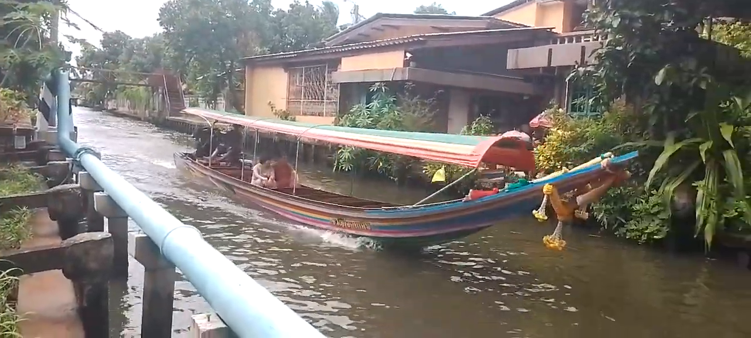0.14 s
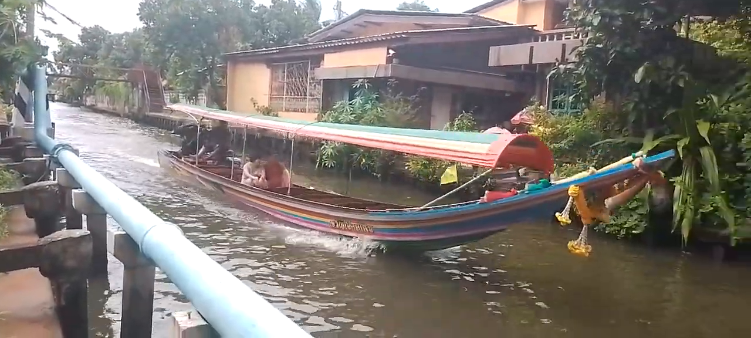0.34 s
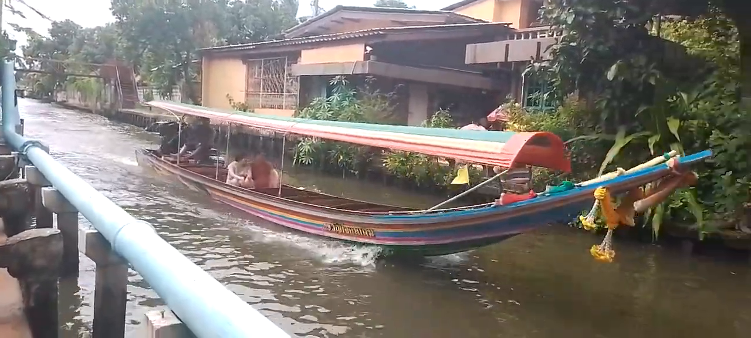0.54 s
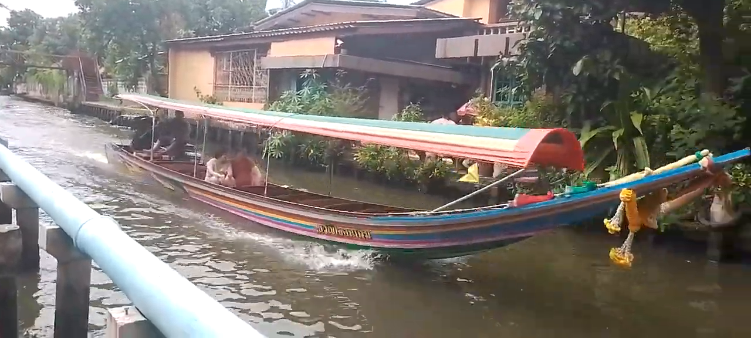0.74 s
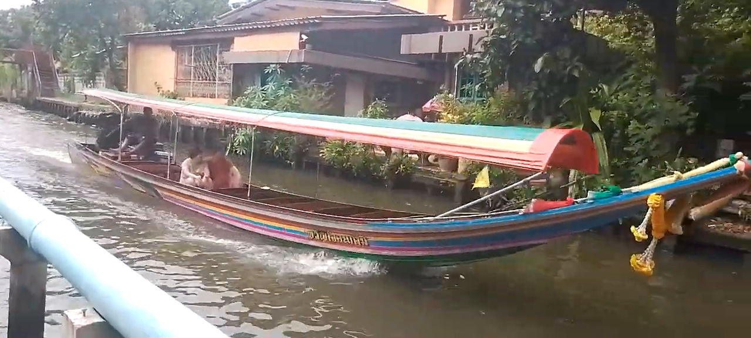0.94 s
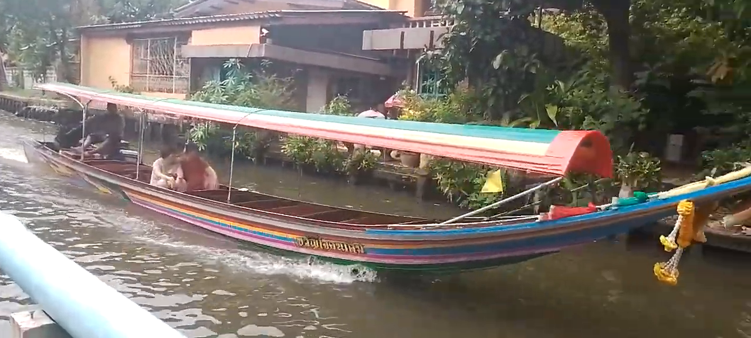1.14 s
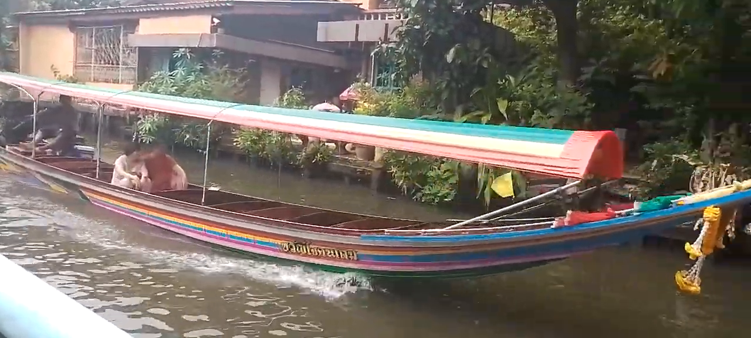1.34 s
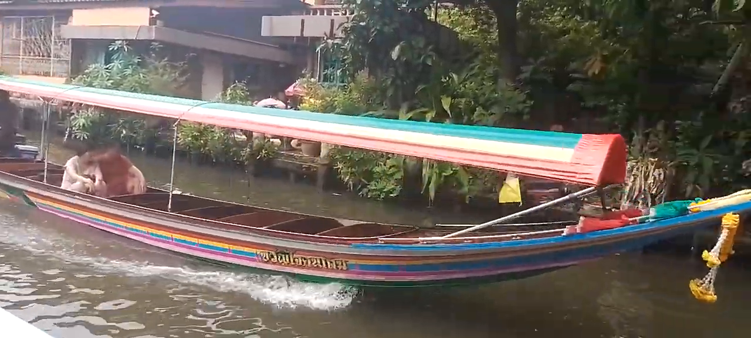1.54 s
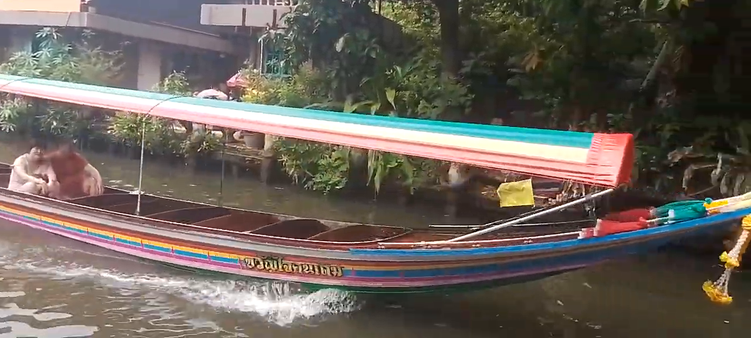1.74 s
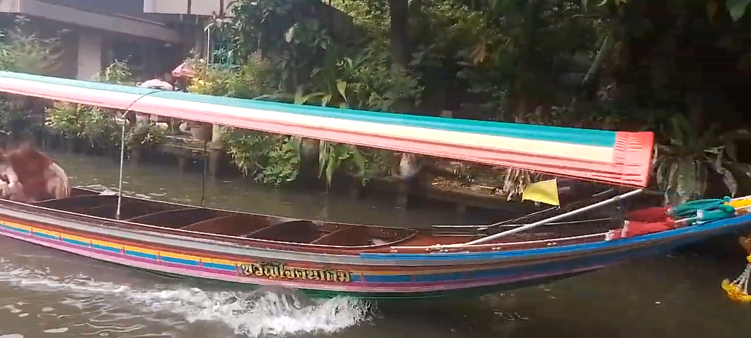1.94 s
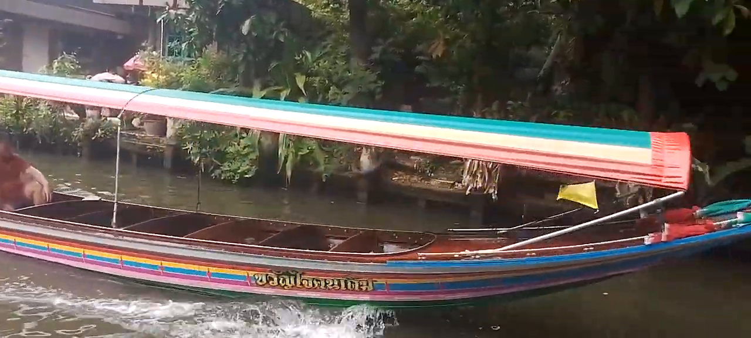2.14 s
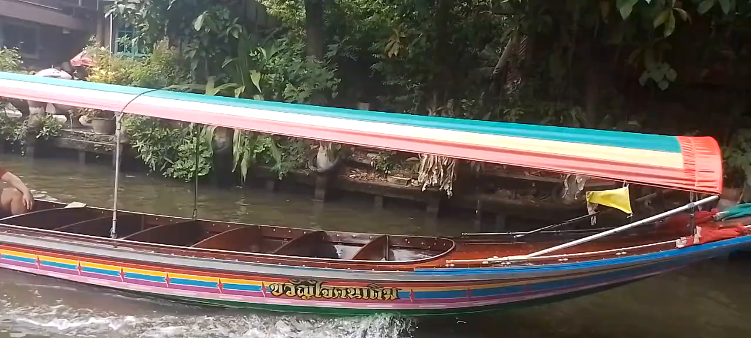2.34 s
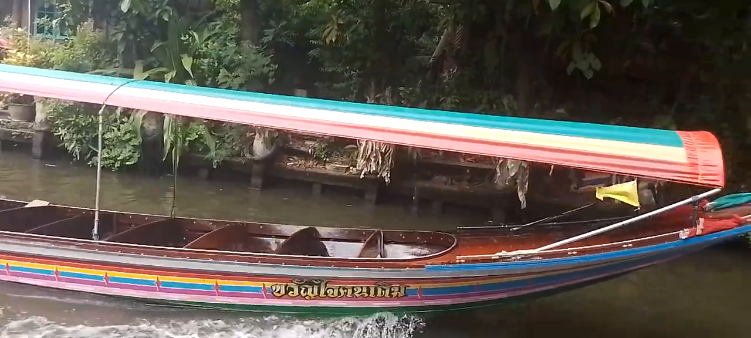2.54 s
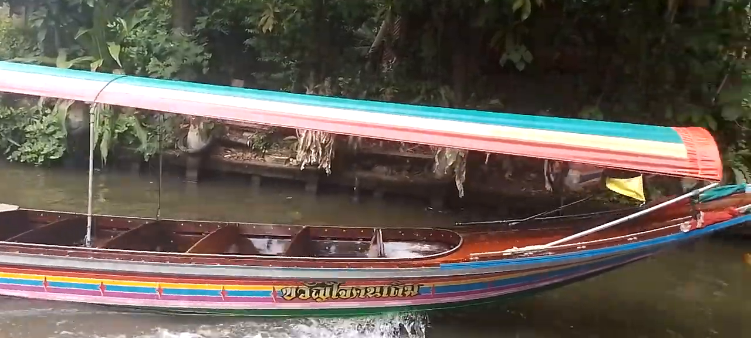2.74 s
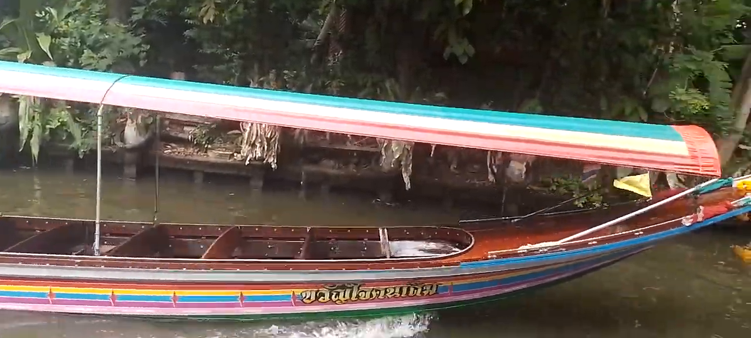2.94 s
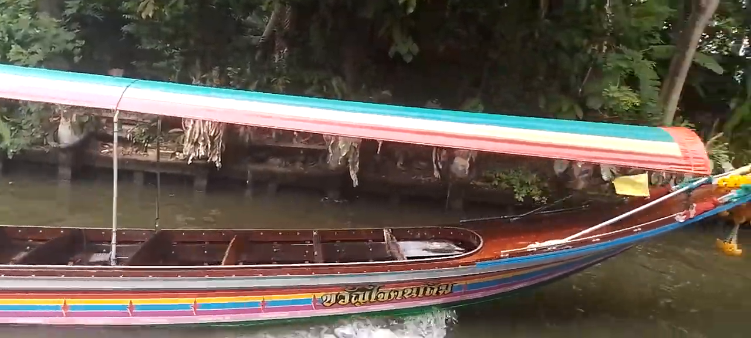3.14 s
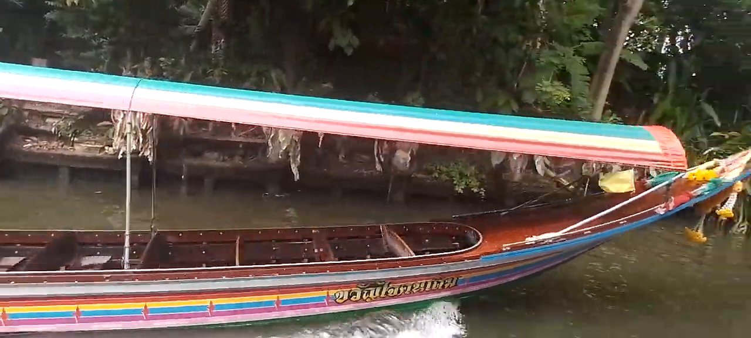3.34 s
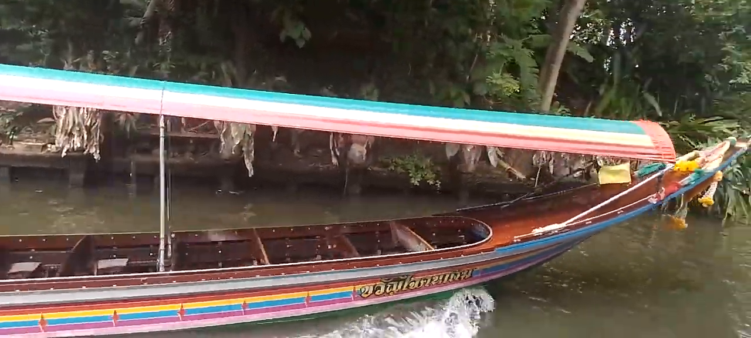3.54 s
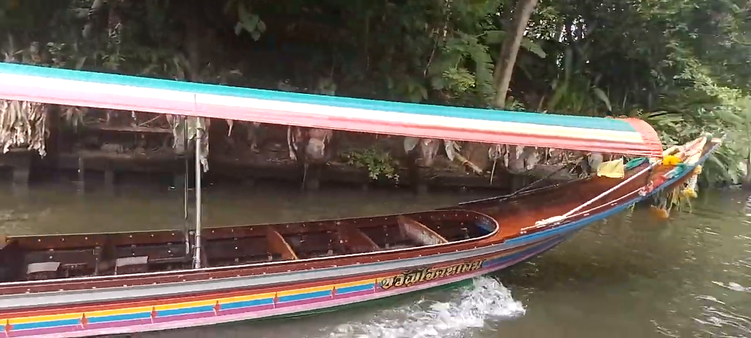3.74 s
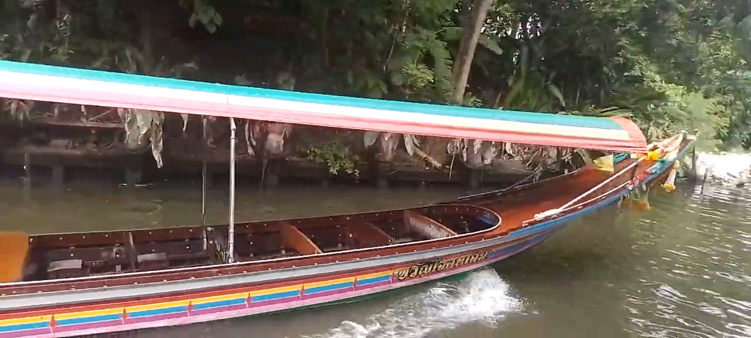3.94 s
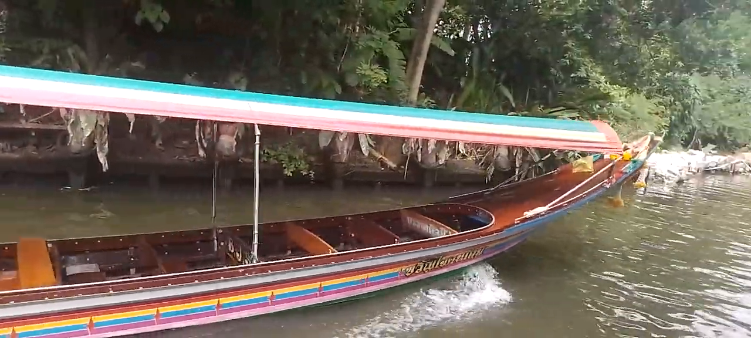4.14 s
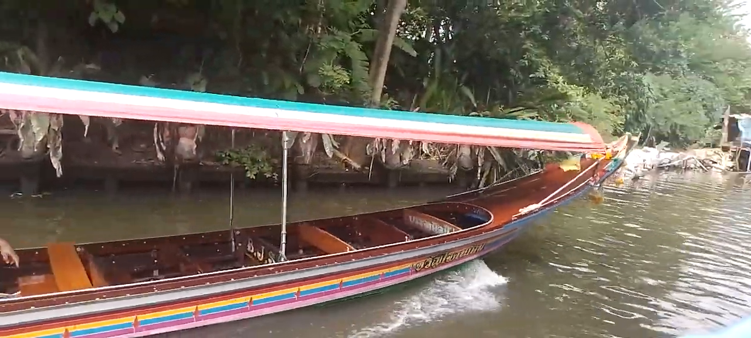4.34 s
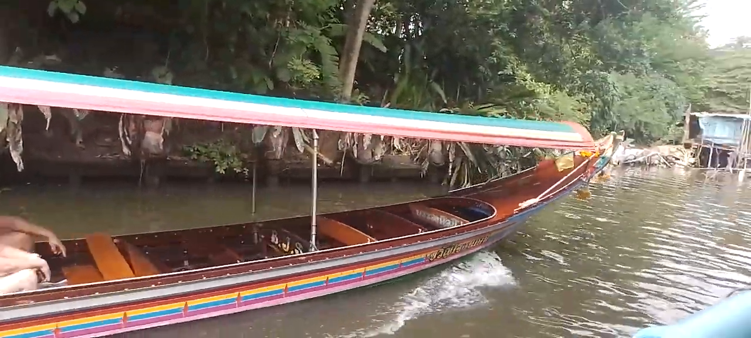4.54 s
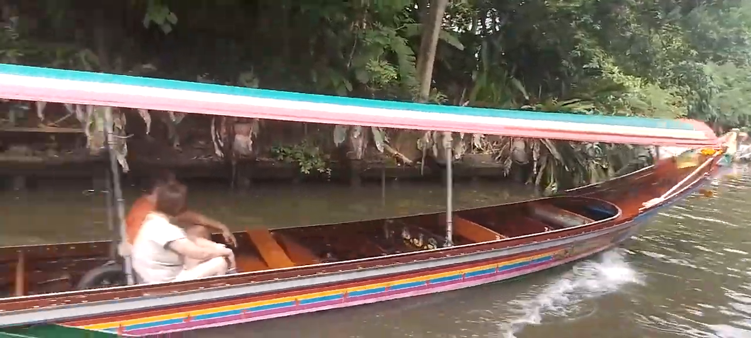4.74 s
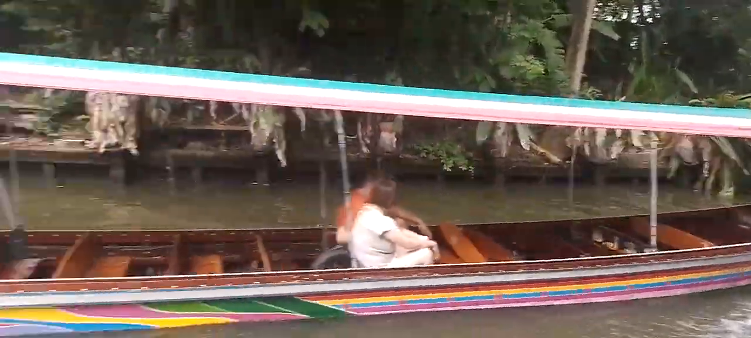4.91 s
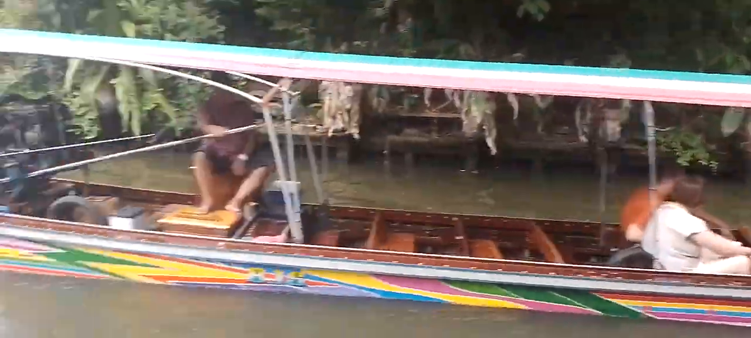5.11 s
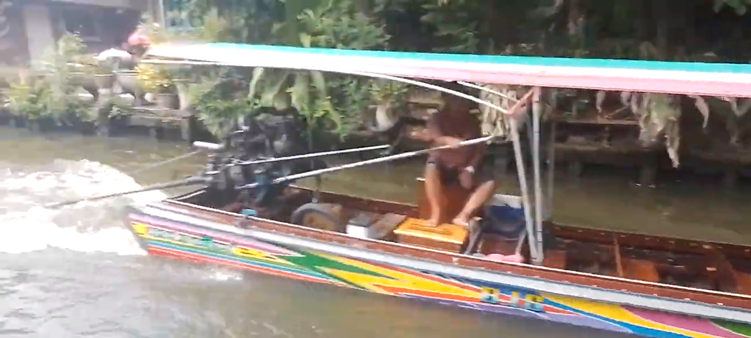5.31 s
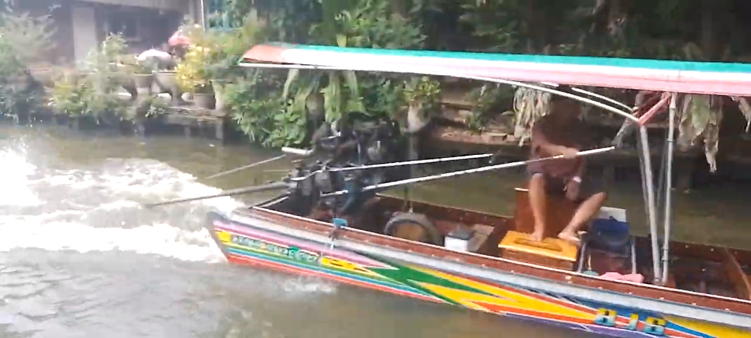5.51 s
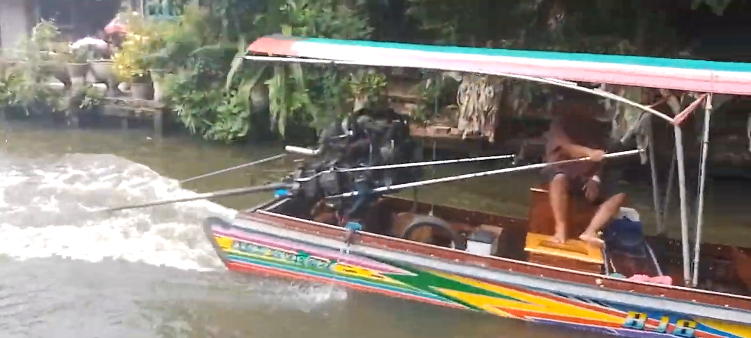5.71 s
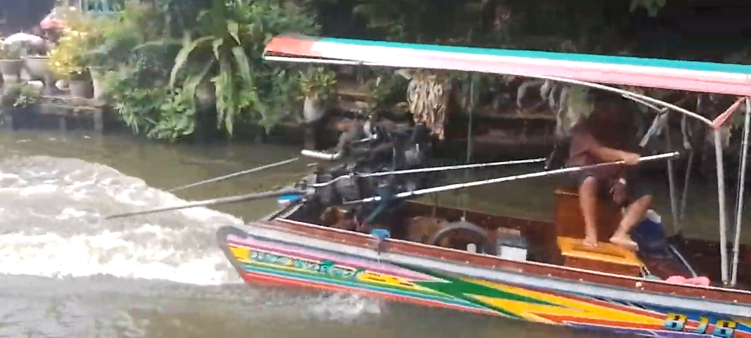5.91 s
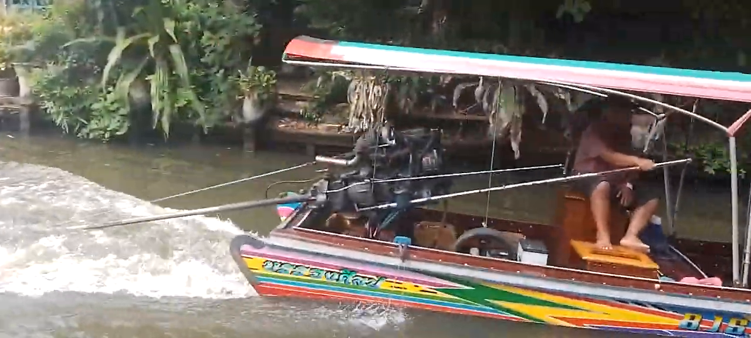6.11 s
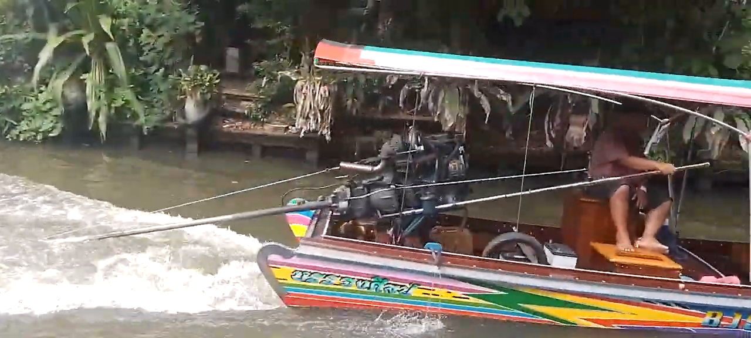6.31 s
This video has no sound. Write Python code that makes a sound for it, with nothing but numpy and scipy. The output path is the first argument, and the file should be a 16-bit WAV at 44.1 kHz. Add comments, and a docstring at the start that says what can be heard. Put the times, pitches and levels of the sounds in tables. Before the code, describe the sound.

A long narrow boat comes along a canal, its open stern engine throbbing faintly over a hiss of water. The hum grows and a loose metal part clinks several times. Then the engine revs higher and the stern passes close to the microphone, with splashing spray and a run of rough exhaust barks. The engine is loudest at the end, over the rush of the wake.

```python
"""The open stern engine of a long narrow boat throbs and hums as it passes close by on a canal.
One firing per crank turn rings the exhaust pipe, which barks as the stern goes by; a loose part clinks.
Engine roar and the rush of spray reach two microphone ports that each whistle at their own pitch.
A noise suppressor holds down whatever is faint."""
import sys
import numpy as np
from scipy import signal
from scipy.io import wavfile
from scipy.ndimage import uniform_filter1d

SR = 44100
rng = np.random.default_rng(int(sys.argv[2]) if len(sys.argv) > 2 else 0)


def master_out(mix):
    """Clip the mix to full scale and print it as 16-bit PCM to the path in sys.argv[1]."""
    frames = np.transpose(np.atleast_2d(mix))
    ceiling = np.clip(frames, -1, 1)
    pcm = np.round(ceiling * 32767).astype(np.int16)
    wavfile.write(sys.argv[1], SR, pcm)


N = 285327
FRAME, HOP = 1024, 256

# Each row: time in seconds, engine in view 0-1, left port lag in ms, factor on port coherence.
BEARING = [(0, 0.5, 0.21, 3.1), (1.5, 0.1, .23, 0.85), (3, 0.04, 0.34, 0.98), (3.6, 0.1, 0.37, 0.32),
           (4.6, 0, 0.35, 1), (4.85, 0.12, 0.44, 1.1), (5.1, 0.55, 0.32, 0.96), (5.18, 0.6, 0.22, 1.25),
           (5.6, 0.67, 0.06, 0.9), (6.47, 0.82, 0.073, 0.73)]
# Each row: time in seconds, nearness of the boat 0-1.
NEARNESS = [(0, 0.13), (3.2, 0.4), (3.8, 0.36), (4.2, 0.9), (6.47, 0.7)]
# Each row: frequency in Hz, base coherence of the two ports 0-1.
COHERENCE = [(300, 0.95), (700, 0.91), (1000, 1), (1500, 0.22), (3000, 0.12), (5000, 0.1), (8000, 0.25),
             (15000, 0.042)]
# Each row: time in seconds, then base levels of roar, left spray and right spray in dB.
RUSH_DB = [(0, -75, -68, -73), (.3, -74.5, -67.5, -74), (.85, -74, -66, -71), (1.2, -74, -63.5, -71.5),
           (1.9, -73, -61, -71.6), (2.8, -72, -60, -71), (3.5, -72, -65, -69), (3.85, -71, -66, -68.5),
           (4.15, -68.5, -63, -63.5), (4.45, -65.5, -60.5, -62), (4.86, -64.5, -61.5, -60.5),
           (4.91, -63.5, -53.5, -57.5), (5.2, -63, -51, -56), (5.4, -63, -52.5, -58), (5.7, -63, -58, -63),
           (6.2, -63.5, -57, -62.5), (6.47, -64, -53.5, -58.5)]
# Each row: frequency in Hz, rumble gain in dB.
RUMBLE_DB = [(10, -14), (45, -22), (70, -24), (110, -10), (140, 2), (165, -13), (200, 3), (300, -15),
             (450, -60)]

# Spray through the ports, nearing and abreast. Each row: frequency in Hz, left and right gain in dB.
SPRAY_AHEAD_DB = [(4000, -15, -15), (5000, -15, -15), (5900, -11.5, -14), (6550, -5.5, -10),
                  (7050, 0, -9.5), (7500, -5, -9), (8100, -11, -4), (9000, -12.5, -2), (10200, -16.5, -1),
                  (11000, -19, -2), (12000, -20, -7), (13200, -21, -13), (14200, -21, -16),
                  (15500, -21, -18)]
SPRAY_ABREAST_DB = [(4000, -12.9, -7.6), (5000, -10.9, -8.7), (5800, -7.6, -8.0), (6400, -4.5, -6.7),
                    (7050, 0.0, -6.1), (7600, -1.2, -4.0), (8200, -7.7, -4.2), (9000, -13.0, -2.8),
                    (10200, -15.7, 0.0), (11000, -15.3, -2.2), (12000, -18.0, -4), (13200, -18, -6.5),
                    (14200, -18, -9.5), (15500, -19, -12)]
# Sheets of spray off the stern. Each row: centre in seconds, left and right level in dB.
SPLASHES = [(4.93, -51, -51.5), (5.038, -44, -63), (5.09, -50, -57), (5.148, -59, -58), (5.222, -53.5, -62),
            (5.288, -49.5, -54), (5.325, -69, -61), (5.413, -45.5, -56), (5.462, -49.5, -56),
            (5.547, -56, -78)]
# Spray reflected by the hull. Each row: time in seconds, comb ripple in dB.
HULL_ECHO_DB = [(4.85, 0), (4.92, 3), (5.45, 3), (5.6, 0)]
# The clearest drops. Each row: time in seconds, added treble gain.
DROPS = [(3.083, 1), (3.09, 1.2), (3.1565, 2.8), (3.191, 1.1), (5.292, 1), (5.547, .8)]

# Roar from afar, behind the hull and in view. Each row: frequency in Hz, left and right gain in dB.
ROAR_FAR_DB = [(427, -6, -10.5), (716, -4.5, -4.5), (815, -1.5, -0.5), (1215, 0, -1.5), (1370, -2, -6),
               (1870, -1, -1), (2580, -5, -3), (2920, -4, -4), (4100, -10, -3), (4550, -8.5, -4)]
ROAR_HIDDEN_DB = [(450, -2.0, -3.5), (700, -6, -8), (850, -3, -6), (1000, -6, -8), (1300, -6.5, -3),
                  (1500, -8, -7), (1800, -7, -11), (2100, -7, -10), (2400, -5, -10), (2700, -8.0, -11),
                  (3200, -6, -10), (3700, -4, -10), (4050, -5.5, -10), (4400, -5.5, -10), (4800, -8, -12)]
ROAR_ASTERN_DB = [(417, -2, 0), (670, -10, -13.5), (895, -4, -1.5), (1160, -4.5, -6), (1470, -9, -12.5),
                  (1700, -6, -9), (1900, -7, -11), (2200, -10, -4), (2600, -6, -9), (2900, -3, -3),
                  (3200, -10, -12), (3500, -1.5, -2.5), (4050, -4, -4), (4350, -6, -11), (4900, -6, -11),
                  (5200, -7, -22)]
# Singing bands. Each row: start and end in seconds, first pitch, last pitch and width in Hz,
# left and right dB over the base roar level. Rows that end before they start are silent.
WHISTLES = [(-0.15, 0.86, 6820, 6700, 300, 7.5, -30), (2.5, 2.9, 5100, 4400, 60, -4, -3),
            (3.1, 4.1, 11600, 8700, 140, -30, 2), (5, 4.6, 9900, 10250, 220, -30, 6.5),
            (3.5, 4, 9520, 9520, 160, -30, 5.5), (3.85, 4.14, 10850, 10000, 200, -30, 1),
            (3, 5.6, 1270, 1360, 130, -29, -1), (3.9, 4.45, 1630, 1680, 104, 2.5, -2),
            (3, 4.4, 920, 990, 64, -1, -9.5), (4.5, 5.14, 2230, 2300, 160, -0.5, -30),
            (5, 4.6, 3500, 4100, 160, -3.5, -30), (4.5, 4.9, 1110, 1160, 74, -8, 2)]
# A gap in the rush as the stern draws level. Each row: time in seconds, centre in Hz, depth in dB.
RUSH_GAP = [(4.3, 2730, 0), (4.45, 2770, 2), (5.0, 2670, 7), (5.15, 2440, 11), (5.3, 2400, 3),
            (5.42, 2370, -3.5)]
# Each row: start in seconds, level in dB, pitch in Hz.
CLINKS = [(1.2226, -32.5, 4330), (1.5983, -35, 4200), (1.9455, -34, 4236), (2.1306, -37, 4334),
          (2.4404, -40, 1645), (2.5032, -34.5, 1710), (2.6403, -34.5, 1730), (2.778, -39, 1680),
          (2.8107, -33.5, 1670), (3.052, -37, 1807), (4.147, -30, 4360)]

# Each row: time in seconds, crank rate in Hz.
CRANK_HZ = [(0, 31), (.45, 33), (1.2, 33.4), (1.5, 31.2), (1.78, 29.5), (2.8, 29.15), (3.4, 29.25),
            (3.9, 30.2), (4.3, 33.05), (4.8, 36.8), (5.15, 41.1), (5.3, 42.6), (5.65, 43.45), (6.1, 43.25),
            (6.47, 41.5)]
# Each row: time in seconds, steady exhaust level in dB, third-order hum level in dB.
ENGINE_DB = [(0, -57, -75), (.3, -57.5, -84), (.75, -63.5, -86.5), (1.05, -57, -91), (1.3, -65.5, -87),
             (1.62, -57.5, -80), (1.76, -46, -63), (2.1, -46.5, -61), (2.9, -43.5, -62), (3.45, -46, -60),
             (3.65, -46, -69), (4.0, -43.5, -62), (4.25, -39.5, -67.5), (4.55, -43.5, -65.5),
             (4.8, -42.5, -70), (5.2, -41.5, -58), (5.6, -39, -63), (6.47, -36.5, -58)]
# Hum of orders 1 and 2. Each row: frequency in Hz, base level in dB.
LOW_HUM_DB = [(29, -92), (33, -84), (38, -85), (43, -75), (58, -74), (62, -69.5), (67, -71), (73, -66),
              (82, -57.5), (87, -60.5)]
# Pipe modes for tone, puffs and rasp. Each row: frequency in Hz, width in Hz, relative gain in dB.
TONE_MODES = [(232.4, 41, 3), (283.3, 52, 4.5), (317, 32, -3.5), (370, 450, -13.5)]
PUFF_MODES = [(260, 91, 1), (325.7, 73, -1.5), (464, 76, -12.5)]
RASP_MODES = [(950, 110, -4), (1250, 200, -13)]
# Each row: time in seconds, share of noise in the exhaust 0-1.
ROUGHNESS = [(0, .85), (1.6, .85), (2.1, .55), (2.8, .33), (3.6, .33), (3.9, .7), (4.2, .85), (5.1, .85),
             (5.25, .7), (6.47, .65)]
# Each row: peak time in seconds, exhaust level in dB.
BARKS = [(5.226, -28.5), (5.259, -33.5), (5.305, -30.5), (5.345, -36.5), (5.718, -29.5), (5.79, -37),
         (5.84, -38), (5.9, -36), (6.078, -28), (6.112, -28), (6.176, -27), (6.22, -40), (6.27, -33),
         (6.36, -33)]
# Each row: frequency in Hz, full suppressor depth in dB.
SUPPRESSION_DB = [(400, 0), (520, 16)]


def gain_of(db):
    """Decibels to gain."""
    return 10 ** (np.asarray(db) / 20)


def sum_db(*levels_db):
    """Power sum of levels."""
    return 10 * np.log10(sum(gain_of(2 * db) + 1e-20 for db in levels_db))


def unit_rms(x):
    """Scales to rms 1."""
    return x / np.sqrt(np.mean(x ** 2) + 1e-20)


def along(table, at):
    """Value columns interpolated at given times or frequencies."""
    axis, *columns = np.transpose(table)
    return np.array([np.interp(at, axis, column) for column in columns])


def drift(count, span_s, rate_hz=SR):
    """Smoothed noise of rms 1."""
    steps = max(int(span_s * rate_hz), 1)
    return unit_rms(uniform_filter1d(uniform_filter1d(rng.standard_normal(count), steps), steps))


def highpass(x, order, hz):
    """Butterworth high-pass."""
    return signal.sosfilt(signal.butter(order, hz, "high", fs=SR, output="sos"), x)


def ring(x, hz, width_hz):
    """Two identical resonators in series, peak gain 1."""
    b, a = signal.iirpeak(hz, hz / width_hz, SR)
    return signal.lfilter(b, a, signal.lfilter(b, a, x))


def rumble_db(hz, t):
    """Low rumble that swells with the roar."""
    level_db = along(RUSH_DB, t)[0]
    return along(RUMBLE_DB, hz)[0] - 93 + 1.5 * (level_db - level_db[0])


def spray_db(hz, t, in_view, splash_s=.013, echo_s=15 / 5954):
    """Spray and splashes coloured by each port; the hull's echo combs the left."""
    steady_db = along(RUSH_DB, t)[1:]
    sheets_db = [np.array(db)[:, None] - 10 * np.log10(np.e) * np.minimum(abs(t - at_s) / splash_s, 9) ** 2
                 for at_s, *db in SPLASHES]
    level_db = sum_db(steady_db, *sheets_db)
    db = (1 - in_view) * along(SPRAY_AHEAD_DB, hz) + in_view * along(SPRAY_ABREAST_DB, hz)
    db += level_db[:, None]
    dulling = .6 * np.clip((6000 - hz) / 800, 0, 1)  # splashes lift the highs most
    db -= dulling * (level_db - steady_db)[:, None]
    db[0] += along(HULL_ECHO_DB, t)[0] * np.cos(2 * np.pi * hz * echo_s)
    db -= .0093 * np.maximum(4000 - hz, 0)
    return db + .5 * drift(len(t), .03, SR / HOP)


def drops(rate_hz=60, decay_s=.004):
    """A gain that jumps with each drop of spray and falls back."""
    hits = .38 * np.minimum(rng.exponential(1, N), 2) * (rng.random(N) < rate_hz / SR)
    for at_s, lift in DROPS:
        hits[round(at_s * SR)] += lift
    return signal.lfilter([1], [1, -np.exp(-1 / (decay_s * SR))], hits)


def whistles(hz, t, fade_s=.08):
    """Relative power of narrow bands that sing out for a while."""
    power = 0
    for start_s, end_s, first_hz, last_hz, width_hz, *db in WHISTLES:
        centre_hz = np.interp(t, [start_s, end_s], [first_hz, last_hz])
        gate = np.clip(np.minimum(t - start_s, end_s - t) / fade_s + .5, 0, 1) ** 2
        band = 1 / (1 + (2 * (hz - centre_hz) / width_hz) ** 4)
        power += gain_of(db)[:, None, None] ** 2 * gate * band
    return power


def roar_power(hz, t, in_view):
    """Engine roar with whistles; its colour shifts as the engine nears and clears the hull."""
    near = along(NEARNESS, t)[0]
    ahead_db = (1 - near) * along(ROAR_FAR_DB, hz) + near * along(ROAR_HIDDEN_DB, hz)
    colour_db = (1 - in_view) * ahead_db + in_view * (along(ROAR_ASTERN_DB, hz) + 2) + 3.5
    colour_db -= .006 * np.maximum(hz - 7600, 0) + .15 * np.maximum(450 - hz, 0)
    left_db = along(RUSH_DB, t)[0]
    level_db = np.array([left_db, left_db + .03 + .04 * in_view])[:, None]
    return gain_of(2 * level_db) * (gain_of(2 * colour_db) + whistles(hz, t))


def port_noise(power, hz, t):
    """Noise from power[port, frequency, frame]; partly coherent, later on the left."""
    _, lag_ms, likeness = along(BEARING, t)
    a, b, c, d, patches = rng.standard_normal((len(t), len(hz), 5)).T
    patches = uniform_filter1d(uniform_filter1d(patches, size=8, axis=0), size=10, axis=1)
    flicker = gain_of(1.14 * unit_rms(patches))
    coherence = np.clip(along(COHERENCE, hz)[0] * likeness, 0, .99)
    right = a + 1j * b
    delayed = right * np.exp(-2j * np.pi * hz * lag_ms / 1000)
    left = coherence * delayed + np.sqrt(1 - coherence ** 2) * (c + 1j * d)
    spectra = np.array([left, right]) * np.sqrt(power * SR * 1.5 / FRAME) * flicker
    return signal.istft(spectra, nperseg=FRAME, noverlap=FRAME - HOP)[1][:, :N]


def rush(turns, gap_half_width_hz=120):
    """Rumble, spray and roar, all throbbing with the crank."""
    hz = np.fft.rfftfreq(FRAME, 1 / SR)[:, None]
    t = np.arange(N // HOP + 5) * HOP / SR
    in_view = along(BEARING, t)[0]
    power = gain_of(2 * rumble_db(hz, t)) + gain_of(2 * spray_db(hz, t, in_view))
    power += roar_power(hz, t, in_view)
    gap_hz, gap_db = along(RUSH_GAP, t)
    power /= gain_of(2 * gap_db * np.exp(-((hz - gap_hz) / gap_half_width_hz) ** 2))
    noise = port_noise(power, hz, t)
    noise = signal.lfilter(*signal.iirnotch(163, 4, SR), noise)  # dip in the rumble
    noise += drops() * highpass(noise, order=2, hz=2500)
    throb = .094 * np.cos(2 * np.pi * turns) + .041 * np.cos(4 * np.pi * turns + 1)
    return noise * (1 + throb * np.array([[.8], [1.2]]))


def clinks(attack_s=.0022, t60_s=.066):
    """A loose metal part rattles and rings, nearer the left port."""
    track, t = np.zeros(N), np.arange(4000) / SR
    for start_s, db, hz in CLINKS:
        rattle = np.sin(2 * np.pi * hz * t + 1.2 * drift(len(t), .002))
        envelope = gain_of(db - 60 * t / t60_s) * np.minimum(t / attack_s, 1)
        track[round(start_s * SR):][:len(t)] += envelope * rattle
    return track * gain_of([[4], [-5]])


def hum(turns, t, crank_hz, in_view):
    """Engine orders 1-5 as wavering sines; 3-5 break up with the engine in view."""
    near_db = 6 * along(NEARNESS, t)[0]
    low_db = [along(LOW_HUM_DB, order * crank_hz)[0] + near_db for order in (1, 2)]
    third_db = along(ENGINE_DB, t)[1]
    track = np.zeros(N)
    for order, db in enumerate([*low_db, third_db, third_db - 9.5, third_db - 10], 1):
        waver_db = (.8 + 3.5 * in_view * (order > 2)) * drift(N, .08)
        track += np.sqrt(2) * gain_of(db + waver_db) * np.sin(2 * np.pi * (order * turns + rng.random()))
    return track


def barks_db(t, rise_s=.018, fall_s=.07):
    """Level of the exhaust barks: fast rise, exponential decay."""
    levels_db = []
    for peak_s, db in BARKS:
        age_s = t - peak_s
        log_envelope = np.where(age_s < 0, -np.minimum(-age_s / rise_s, 9) ** 2, -age_s / fall_s)
        levels_db.append(db + 20 * np.log10(np.e) * log_envelope)
    return sum_db(*levels_db)


def pipe(drive, modes):
    """The exhaust pipe rings at its modes; rms 1."""
    ringing = sum(gain_of(db) * ring(drive, hz, 1.44 * width_hz) for hz, width_hz, db in modes)
    return unit_rms(highpass(ringing, order=8, hz=224))


def exhaust(turns, t, in_view):
    """One firing a turn drives the pipe with orders 6-16 and noise puffs; upper modes rasp from astern."""
    steady_db, rough = along(ENGINE_DB, t)[0], along(ROUGHNESS, t)[0]
    orders = sum(gain_of(3.5 * drift(N, .2)) * np.cos(2 * np.pi * order * turns + drift(N, .6))
                 for order in range(6, 17))
    firing_scatter = rng.standard_normal(int(turns[-1]) + 1)[turns.astype(int)]
    strength = gain_of(2.46 * uniform_filter1d(firing_scatter, size=200))
    phase = turns % 1
    puffs = strength * (.5 + np.exp(-phase / .62)) * rng.standard_normal(N)
    gusts = strength * np.exp(-phase / .22) * rng.standard_normal(N)
    tone = np.sqrt(1 - rough) * pipe(orders * strength ** rough, TONE_MODES)
    chuff = np.sqrt(rough) * pipe(puffs, PUFF_MODES)
    rasp = sum(gain_of(db) * unit_rms(ring(gusts, hz, width_hz)) for hz, width_hz, db in RASP_MODES)
    level_db = sum_db(steady_db, barks_db(t))
    rasp_db = steady_db + 5.5 + .44 * (level_db - steady_db)  # partly follows the barks
    return gain_of(level_db) * (tone + chuff) + gain_of(rasp_db) * in_view * rasp


def scene():
    """The boat passes; its engine reaches the left port later."""
    samples = np.arange(N)
    t = samples / SR
    in_view, lag_ms, _ = along(BEARING, t)
    crank_hz = along(CRANK_HZ, t)[0]
    turns = np.cumsum(crank_hz) / SR
    engine = hum(turns, t, crank_hz, in_view) + exhaust(turns, t, in_view)
    delayed = np.interp(samples - lag_ms * SR / 1000, samples, engine)
    return np.array([delayed, engine]) * gain_of([[-.2], [.2]]) + rush(turns) + clinks()


def record(dry):
    """A suppressor lowers bins under its threshold; then microphone hiss and a band limit."""
    threshold_db, hiss_db, cutoff_hz = -69, -96, 15700  # levels per Hz
    hz, _, spectra = signal.stft(dry, SR, nperseg=FRAME, noverlap=FRAME - HOP)
    power = abs(spectra) ** 2 * FRAME * 4 / 3 / SR
    smoothed = uniform_filter1d(uniform_filter1d(power, size=3, axis=1), size=23, axis=2, origin=4)
    over_db = 10 * np.log10(abs(smoothed) + 1e-16) - threshold_db
    shut = .5 - .5 * np.tanh(over_db / 4.5)
    spectra /= gain_of(along(SUPPRESSION_DB, hz)[0][:, None] * shut)
    gated = signal.istft(spectra, nperseg=FRAME, noverlap=FRAME - HOP)[1][:, :N]
    hiss = gain_of(hiss_db) * np.sqrt(SR / 2) * rng.standard_normal(gated.shape)
    lowpass = signal.firwin(1023, cutoff_hz, window=("kaiser", 9), fs=SR)
    return signal.oaconvolve(gated + highpass(hiss, order=4, hz=9000), lowpass[None], "same")


dry = scene()
out = record(dry)
master_out(out)
```